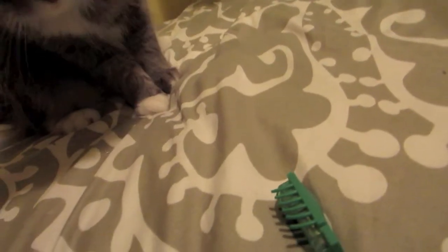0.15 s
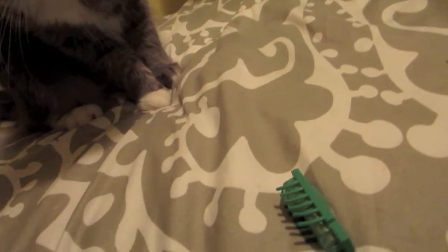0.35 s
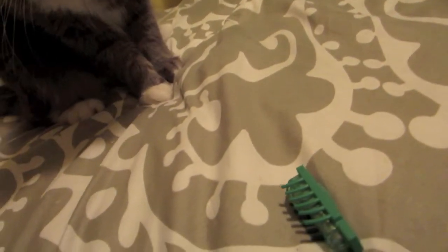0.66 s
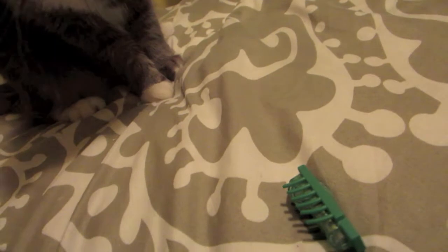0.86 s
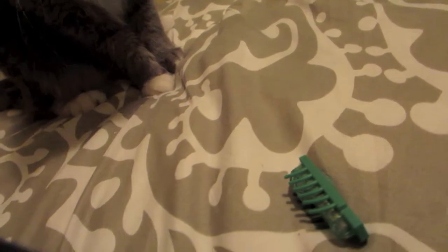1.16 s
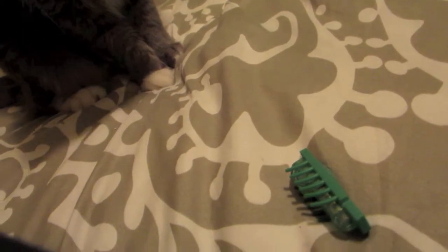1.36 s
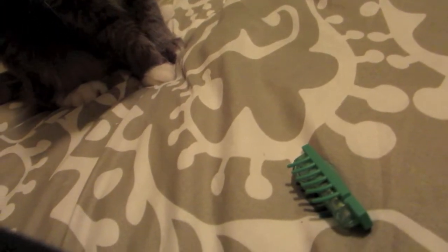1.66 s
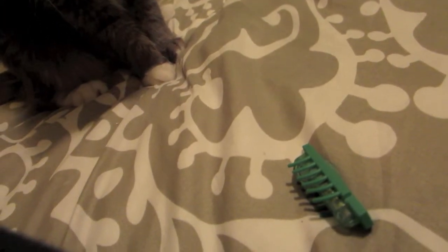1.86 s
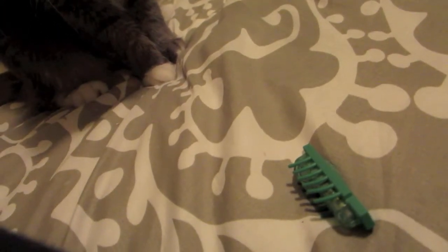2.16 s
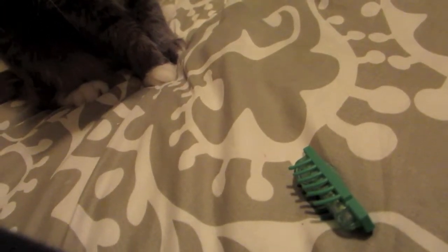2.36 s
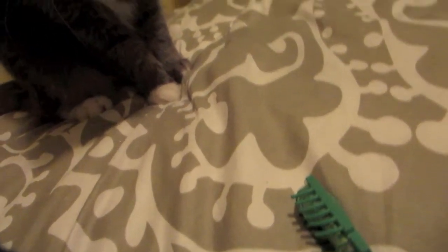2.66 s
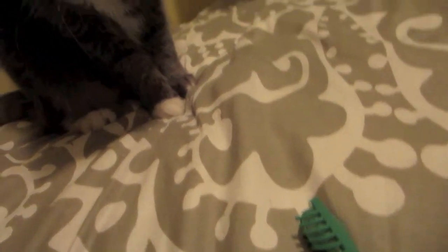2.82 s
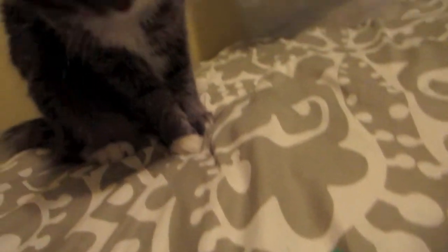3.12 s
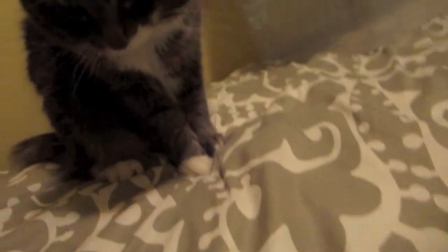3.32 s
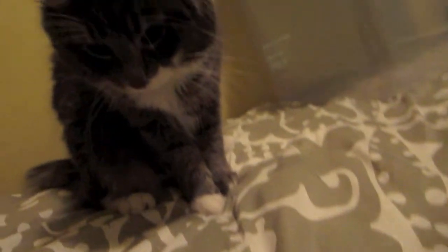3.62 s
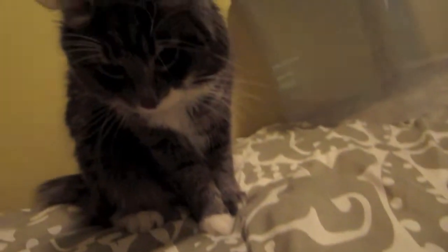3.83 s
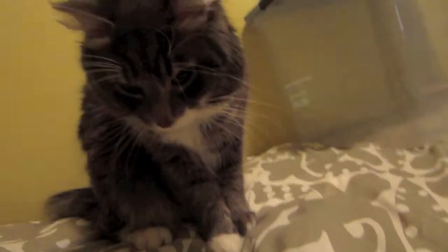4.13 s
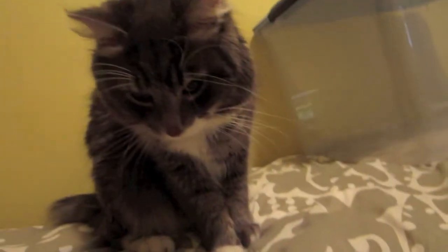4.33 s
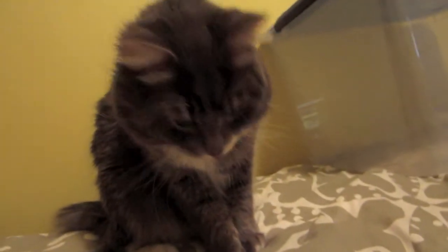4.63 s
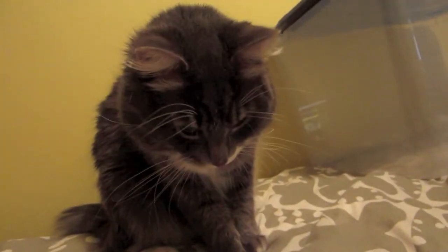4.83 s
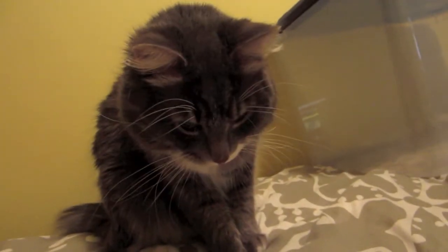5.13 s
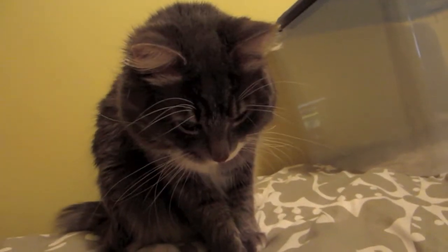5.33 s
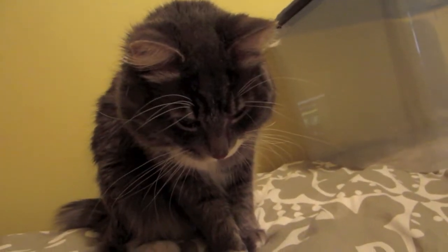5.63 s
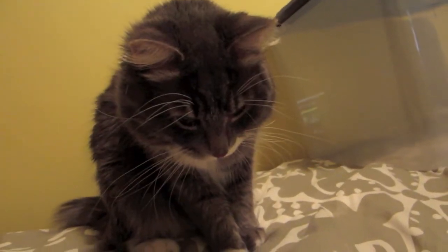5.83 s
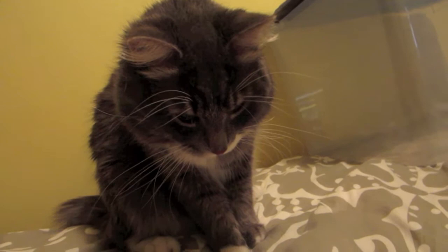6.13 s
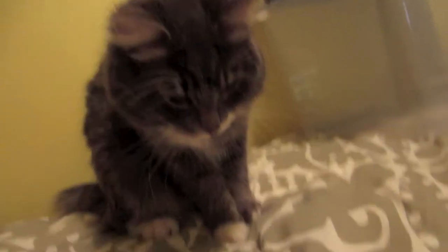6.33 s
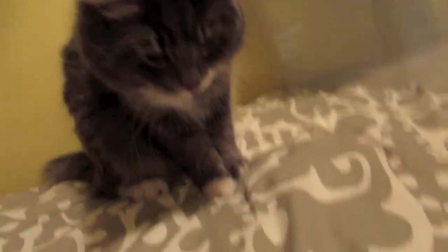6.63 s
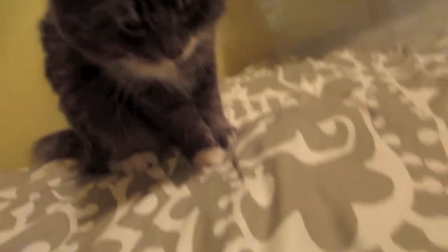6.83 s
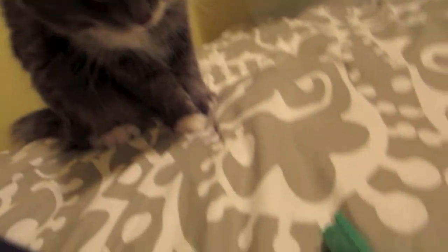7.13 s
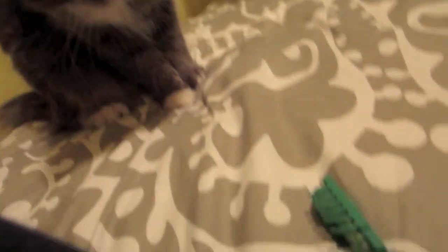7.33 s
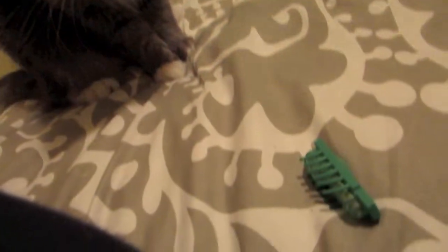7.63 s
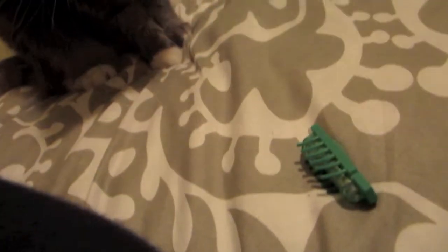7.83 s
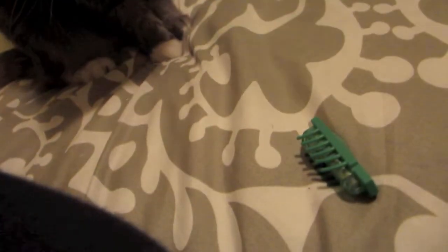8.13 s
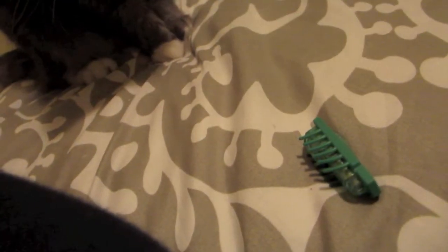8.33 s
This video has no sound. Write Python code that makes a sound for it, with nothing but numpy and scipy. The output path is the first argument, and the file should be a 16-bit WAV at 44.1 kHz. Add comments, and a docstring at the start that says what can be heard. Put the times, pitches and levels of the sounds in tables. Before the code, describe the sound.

Close, continuous buzzing and fine rattling of a vibrating toy bug on a bed, with occasional camera clicks and soft bumps.

```python
"""Toy bug buzzing on a duvet

Close up, on a hand-held camera's stereo microphone: the toy's off-balance motor shakes the cloth once
a turn and its brushes tick over the commutator. The camera clicks and is bumped now and then.
Far off in the room are a fan, a hum and a thin high whine.
The microphone widens the treble: there the two sides are nearly opposed."""
import sys
import numpy as np
from scipy.fft import rfft, irfft, next_fast_len
from scipy.io import wavfile
from scipy.ndimage import map_coordinates

SR = 44100
rng = np.random.default_rng(int(sys.argv[2]) if len(sys.argv) > 2 else 0)


def master(y):
    """Save y as 16-bit WAV."""
    cut = np.clip(np.atleast_2d(y).T, -1, 1)
    pcm = np.round(cut * 32767)  # scale
    wavfile.write(sys.argv[1], SR, pcm.astype(np.int16))


N = 373526
TIME = np.arange(N) / SR

# The motor, close up: time_s, speed_hz, order1_db, order2_db, order3_db
MOTOR_RUN = [(0, 152.22, -30, -35.1, -43.5), (.28, 150.27, -30.9, -35.8, -46.5),
             (.42, 150.08, -31.1, -39.3, -56), (1, 150.19, -29.4, -37.2, -49.3),
             (1.25, 150.02, -29.1, -37, -48.5), (1.49, 148.85, -28.6, -36.9, -49.3),
             (2, 148.9, -28.3, -36.6, -49.3), (2.74, 148.62, -29, -37.7, -49.8),
             (3.24, 147.15, -30.2, -39.7, -50), (3.99, 146.55, -31.7, -42, -50.8),
             (4.23, 145.65, -32.3, -42.8, -50.3), (4.9, 145.45, -32.7, -43, -49.2),
             (5.23, 144.47, -32.9, -42.4, -47.5), (5.73, 144.28, -32.8, -42.1, -47),
             (6.23, 143.05, -33, -42, -46.2), (7.3, 142.8, -30.8, -39.7, -43.2),
             (7.97, 145.01, -29.7, -39, -44.2), (8.47, 144.46, -29.8, -39.4, -45)]
def toy_bug():
    """The weight pulls once a turn; the cloth flattens the crests and sharpens the troughs."""
    speed, *levels = curves(MOTOR_RUN)
    turns = np.cumsum(speed) / SR
    lag = .2 - 1.7 * np.exp(-(TIME / .45) ** 2)  # radians per order; a lead until the toy settles
    shake = sum((-1) ** k * amp(db + .098 * wobble(18)) * np.cos((k + 1) * 2 * np.pi * turns - k * lag)
                for k, db in enumerate(levels))
    mid = np.sqrt(2) * (shake + shell_buzz(turns, speed)) + rattle(turns)
    side = filtered(mid, lambda hz: .03 - .15j * np.minimum(hz / 600, 1))  # it lies a little off axis
    facing_db = levels[0] + 28.3  # zero with the microphone facing the toy
    return np.array([mid, side]) + motor_can(brushes(turns, facing_db))


# Spectrum of the buzz: pitch_hz, level_db
BUZZ_SPECTRUM = [(550, -68), (900, -64.5), (1300, -68.5), (1700, -72), (2500, -74.5), (3400, -76.5),
                 (4500, -87), (6000, -84.5)]
# Overtones swell as the toy shifts on the cloth; near 1.1 s the 9th, close to the hum's upper tone, flares
# briefly as the two beat: centre_s, half_length_s, order, lift_db
BUZZ_SWELLS = [(0.95, 1.03, 4, 11), (1.47, 0.56, 5, 4.5), (0.74, 0.26, 5, 5), (6.8, 2.1, 5, 7),
               (8.4, .4, 4, 1), (2, .4, 6, 5), (2.5, 0.9, 7, 7.5), (3.87, 0.25, 7, 5), (7.86, 0.65, 7, 8),
               (1.9, 0.35, 8, 8.5), (3.4, 0.19, 8, 4.5), (6.7, 1.24, 8, 10.5), (1.07, .04, 9, 6),
               (1.19, .05, 9, 4), (7.9, .5, 34, 10), (7.3, .5, 42, 9), (8, .4, 25, 4), (7.1, .5, 20, 3),
               (2.2, 0.19, 9, 9), (2.9, .15, 9, 3), (4, .6, 9, 3), (8.1, 0.52, 9, 9), (5, 1, 10, 4.5),
               (6.44, .4, 10, 5.5), (8.47, 0.66, 10, 11), (2.5, 0.3, 12, 10.5), (2.45, 0.43, 13, 9.5),
               (1.4, 0.23, 13, 8), (8.8, .3, 14, 8.5), (6.85, .12, 17, 7), (7.2, .15, 17, 7),
               (8.3, .4, 17, 11), (8.1, 0.61, 19, 8), (5.75, 0.2, 23, 9), (5, .6, 19, 4), (6.5, .6, 21, 4),
               (6.8, 0.38, 17, 4), (6.8, .5, 14, 2.5), (4.8, 0.28, 14, 4), (3, .08, 12, 11),
               (1.7, .4, 11, 5), (2.2, .3, 11, 7), (7.15, 0.37, 23, 7.5)]
def shell_buzz(turns, speed):
    """Overtones of the shake fade and flicker; the low ones buzz harder until the shell settles."""
    settling_db = 16 * np.exp(-TIME / .2)
    buzz = np.zeros(N)
    for order in range(4, 44):
        level_db = along(BUZZ_SPECTRUM, order * speed)
        level_db += settling_db / (1 + (order * speed[0] / 1100) ** 4)
        level_db += sum(db * swell(s, half) for s, half, k, db in BUZZ_SWELLS if k == order)
        drift = 2 * np.pi * rng.random() + .5 * wobble(2)
        buzz += amp(level_db + wobble(4) + 1.8 * wobble(20)) * np.cos(order * 2 * np.pi * turns + drift)
    return buzz


# Loose parts rubbing: time_s, level_db
RATTLE_LEVEL = [(0, -54.5), (.4, -55.5), (3, -56.5), (4.3, -61.5), (5.6, -62.5), (6.8, -57.5),
                (8.47, -58.5)]
# Their spectrum: frequency_hz, relative_db
RATTLE_SPECTRUM = [(300, -23), (700, -5.5), (1300, -1), (2500, -3), (4000, -11), (6000, -15.5),
                   (9000, -39.5)]
def rattle(turns):
    """Loose parts rub hardest in one half of each turn."""
    gate = 1 + .23 * np.cos(2 * np.pi * (turns - .33))
    return amp(curves(RATTLE_LEVEL)[0] + 1.16 * wobble(12)) * unit(gate * noise(RATTLE_SPECTRUM))


# Hard contacts: angle_turns, sign
HARD_CONTACTS = [(.06, 1), (.561, -1)]
# Each drops as the microphone turns away: on_axis_db, slope_db_per_db
HARD_LEVELS = [(-49.5, 3), (-50, 2)]
# Light contacts: angle_turns, sign, relative_db
LIGHT_CONTACTS = [(.15, -1, -3), (.4, 1, -5), (.47, -1, -1), (.648, 1, -2), (.897, -1, -4), (.972, 1, -2)]
# Scraping until the brushes bed in: time_s, drive_db
SCRAPE_LEVEL = [(0, -78), (.6, -76), (1.2, -78), (1.45, -92), (8.47, -92)]
def brushes(turns, facing_db):
    """Two hard and six light contacts a turn, with a scrape between, drive the motor can."""
    turns = turns + .001 * wobble(8)
    hard = sum(sign * amp(db + slope * facing_db + wobble(15))
               * ticks(turns, angle, jitter_s=2e-6, scatter_db=1)
               for (angle, sign), (db, slope) in zip(HARD_CONTACTS, HARD_LEVELS))
    light = sum(sign * amp(db + 2 * wobble(3)) * ticks(turns, angle, jitter_s=4e-6, scatter_db=1.5)
                for angle, sign, db in LIGHT_CONTACTS)
    scrape = amp(curves(SCRAPE_LEVEL)[0] + 1.5 * wobble(12)) * (1 + .48 * np.cos(4 * np.pi * turns))
    return hard + amp(-53.5) * light + scrape * rng.standard_normal(N)


# Modes of the can: pitch_hz, width_hz, gain_per_pass_db
CAN_MODES = [(8370, 500, 2), (6666, 1030, 0), (7240, 630, 1.5), (9950, 1200, -18), (10860, 1000, -8),
             (11600, 1000, -5), (12500, 1200, -5)]
# The first mode from further round: pitch_hz, width_hz, gain_per_pass_db
OFF_AXIS_MODE = (8050, 620, 0.92)
# How much of that lower pitch is heard: time_s, power_share
OFF_AXIS_SHARE = [(0, 0), (2.8, .3), (3.3, 0.2), (4, 0.4), (5, 0.76), (6, 0.7), (7.3, 0.3), (7.8, .7),
                  (8.47, .6)]
# The microphone turns: time_s, first_mode_db, first_mid_over_side_db, others_mid_over_side_db
MIC_AIM = [(0, -4, 1, -4), (1, -0.5, -6.5, -4), (2.7, 1, -7, -5.5), (3.4, 4, -14.5, -12.5),
           (4.3, 6.5, -10.5, -10), (5.8, -0.5, -9.5, -11.5), (6.3, -5, -23, -12.5), (7.2, -5, -38, -7.5),
           (8, 6, -23, -7), (8.47, 3, -19, -7)]
# The four upper modes: time_s, gain_db
CAN_SHEEN = [(0, 1.5), (1, -5), (2, -5.5), (3, -2), (4, 6.5), (5, -2.5), (6, 4), (7, -8), (8.47, -6)]
def motor_can(drive):
    """The can rings; its first mode beams, so its level and pitch shift as the microphone moves."""
    def ring(modes):  # each mode acts twice: brush to can, can to air
        return filtered(drive, lambda hz: sum(ringing([mode])(hz) ** 2 for mode in modes))

    share, = curves(OFF_AXIS_SHARE)
    beam, first_mid, others_mid = amp(curves(MIC_AIM))
    sheen = amp(curves(CAN_SHEEN)[0] + 1.2 * wobble(8))
    first = np.sqrt(1 - share) * ring(CAN_MODES[:1]) + np.sqrt(share) * ring([OFF_AXIS_MODE])
    first *= amp(24.5) * beam
    others = amp(24) * (ring(CAN_MODES[1:3]) + sheen * ring(CAN_MODES[3:]))
    mid = filtered(others_mid * others - first_mid * first, lambda hz: 1j)  # a quarter cycle ahead
    return np.array([mid, others - first])


# Snaps right at the microphone: start_s, strength_db, crackle_t60_s, tilt_db_per_octave
CASE_SNAPS = [(.97535, -17, .003, 1), (.976, -19, .002, -2), (.9765, -20, .003, -1),
              (2.413, -22, .0015, -4), (6.2858, -36, .002, 5), (6.6926, -42, .002, 2)]
# The camera case: pitch_hz, width_hz, mid_db, side_db
CASE_MODES = [(750, 700, -14, -4), (1340, 400, -4, -10), (2400, 600, -6, -5), (3200, 350, -16, 3),
              (3570, 330, 2, -9), (4350, 300, 0, -6), (5100, 260, 2, -7), (6170, 450, 2, -3),
              (6900, 500, -9, -2), (7500, 500, 2, 4), (9400, 1200, -5, -12), (11770, 1200, -7, -10),
              (14200, 1500, -13, -17)]
def case_clicks():
    """Plastic snaps, each trailing a crackle, ring the case, unlike at each microphone port."""
    size = 600
    snaps, t = np.zeros(N + size), np.arange(size) / SR
    for s, db, t60, tilt_db in CASE_SNAPS:
        crackle = .3 * amp(-60 * t / t60) * rng.standard_normal(size)
        burst = amp(db) * ((t == 0) + crackle)
        colour = (1j * np.fft.rfftfreq(size, 1 / SR) / 5000 + .1) ** (tilt_db / (20 * np.log10(2)))
        snaps[round(s * SR):][:size] += irfft(rfft(burst) * colour, size)
    mid = filtered(snaps[:N], ringing([(hz, width, db) for hz, width, db, _ in CASE_MODES]))
    side = filtered(snaps[:N], ringing([(hz, width, db) for hz, width, _, db in CASE_MODES]))
    return np.array([mid, side])


# Knocks on the camera: centre_s, peak_db, pitch_hz, half_length_s
CAMERA_BUMPS = [(.6, -54, 90, .05), (.9, -56, 45, .04), (2.33, -58, 50, .04), (2.82, -62, 45, .05),
                (3.13, -54, 65, .04), (3.33, -59, 45, .04), (3.95, -50, 314, .03),
                (6.355, -51, 64.5, 0.025), (6.4, -58, 65, .02), (6.479, -41.5, 179, 0.019),
                (6.486, -45, 312, 0.042), (6.5, -46, 90, 0.03), (6.535, -50, 85, .015),
                (6.59, -55, 70, .02), (6.69, -52, 70, 0.04), (7.042, -57, 50.5, .05)]
def bumps():
    """Soft bumps give a low, wavering swing that both ports feel alike."""
    waver = .98 * wobble(40)
    mid = sum(amp(db) * swell(s, half) * np.sin(2 * np.pi * hz * (TIME - s) + waver)
              for s, db, hz, half in CAMERA_BUMPS)
    return np.array([mid, np.zeros(N)])


# The grip shifts beside the microphone: centre_s, half_length_s, level_db
GRIP_SHIFTS = [(.7, .4, -74), (3.5, .7, -74), (5, 0.86, -75), (6.3, .1, -70), (6.8, .3, -71)]
# Skin on plastic: frequency_hz, relative_db
SKIN_SPECTRUM = [(2000, -30), (4500, -1), (7000, -4), (10000, 1.5), (15000, -5.5)]
def fingers():
    """Fingers slide on the case with a wide, uneven hiss."""
    grip = sum(amp(db) * swell(s, half) for s, half, db in GRIP_SHIFTS) * amp(2.2 * wobble(29))
    return grip * np.array([unit(noise(SKIN_SPECTRUM)) for _ in range(2)])


# A fan across the room, at its normal speed: pitch_hz, level_db, side_share
FAN_TONES = [(235.8, -54, 0.092), (269.5, -51, 0.047), (535, -66, 0.14)]
# Its drift: time_s, relative_speed
FAN_DRIFT = [(0, 1), (5.2, 1), (5.8, 1.017), (6.15, 1.017), (6.6, 1.007), (7.2, 1), (8.47, 1)]
def fan():
    """The fan's tones flutter, and rise and grow with its speed."""
    speed, = curves(FAN_DRIFT)
    spun_s = np.cumsum(speed) / SR
    return speed ** 12 * sum(tone(row, spun_s, 2.26 * wobble(12), .21 * wobble(8)) for row in FAN_TONES)


# A distant hum: pitch_hz, level_db, side_share
HUM_TONES = [(120.2, -61.5, 0.09), (1344, -63, 0.37)]
def hum():
    """Two tones hold their pitch and flutter slightly."""
    return sum(tone(row, TIME, 1.9 * wobble(8), .31 * wobble(6)) for row in HUM_TONES)


# A far-off whine: pitch_hz, left_db, right_db
WHINE_TONE = (15734, -79, -73.5)
def whine():
    """One thin steady tone, louder on the right; returns left and right."""
    hz, *ports_db = WHINE_TONE
    return np.sqrt(2) * amp(ports_db)[:, None] * np.sin(2 * np.pi * hz * TIME)


# Room tone, mid and side: frequency_hz, density_db
ROOM_MID = [(20, -91.5), (45, -88.5), (110, -76.5), (300, -80), (600, -87), (1200, -88.5), (2500, -97),
            (4000, -104), (6500, -107), (9000, -112), (13000, -116), (16000, -114)]
ROOM_SIDE = [(20, -120), (60, -100), (150, -117), (400, -84), (900, -92), (2000, -95.5), (4000, -99),
             (7000, -103), (10000, -105), (13000, -107), (16000, -110)]
def room_tone():
    """Air and microphone noise lie under everything."""
    return np.array([noise(ROOM_MID) * amp(wobble(3.7) / 2), noise(ROOM_SIDE)])


def amp(db):
    return 10 ** (np.asarray(db) / 20)


def unit(x):
    return x / np.sqrt(np.mean(x ** 2) + 1e-20)


def swell(centre_s, half_length_s):
    return np.exp(-((TIME - centre_s) / half_length_s) ** 2)


def tone(row, clock_s, flutter_db, drift):
    """A wavering sine as mid and side."""
    hz, db, side_share = row
    mid = np.sqrt(2) * amp(db + flutter_db) * np.sin(2 * np.pi * hz * clock_s + drift)
    return np.array([mid, side_share * mid])


def along(points, hz):
    """Read (Hz, value) points on a log axis."""
    frequencies, values = np.transpose(points)
    return np.interp(np.log(hz + 1), np.log(frequencies + 1), values)


def curves(rows):
    """One value per sample for each column after the time."""
    times, *columns = np.transpose(rows)
    return [np.interp(TIME, times, column) for column in columns]


def wobble(rate):
    """A smooth random curve, rate knots a second."""
    coarse = TIME[::64]
    knots = rng.standard_normal(int(N * rate / SR) + 4)
    return np.interp(TIME, coarse, map_coordinates(knots, [coarse * rate]))


def filtered(x, response):
    """x through a complex frequency response."""
    size = next_fast_len(N + SR // 2)
    return irfft(rfft(x, size) * response(np.fft.rfftfreq(size, 1 / SR)), size)[..., :N]


def noise(spectrum):
    """Noise with the given dB per Hz."""
    return filtered(rng.standard_normal(N), lambda hz: amp(along(spectrum, hz))) * np.sqrt(SR / 2)


def ringing(modes):
    """The causal response of a set of resonances, with a notch between neighbours."""
    return lambda hz: sum(amp(db) * 1j * hz * width / (pitch ** 2 - hz ** 2 + 1j * hz * width)
                          for pitch, width, db in modes)


def ticks(turns, angle, jitter_s, scatter_db):
    """One impulse each time the shaft passes the angle, placed between samples."""
    when = np.interp(np.arange(1, int(turns[-1]) - 1) + angle, turns, np.arange(N))
    chance = rng.standard_normal((len(when), 2))
    when += jitter_s * SR * chance[:, 0]
    taps = np.floor(when)[:, None] + np.arange(-7, 9)
    gap = taps - when[:, None]
    shape = np.sinc(gap) * np.cos(np.pi * gap / 16) ** 2 * amp(scatter_db * chance[:, 1:])
    return np.bincount(taps.astype(int).ravel(), shape.ravel(), N)[:N]


def scene():
    """Toy, room and handling meet as mid and side, then open out to left and right."""
    mid, side = toy_bug() + fan() + hum() + room_tone() + case_clicks() + bumps() + fingers()
    return np.array([mid + side, mid - side]) + whine()


def record(dry):
    """The camera keeps nothing above its band limit."""
    return filtered(dry, lambda hz: hz < 15850)


dry = scene()
out = record(dry)
master(out)
```